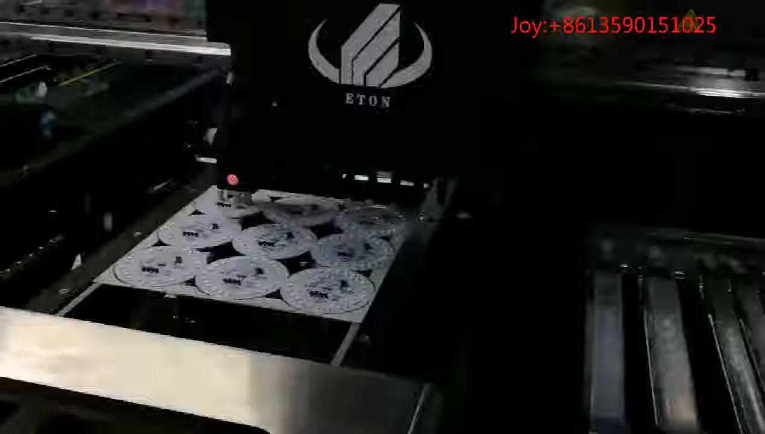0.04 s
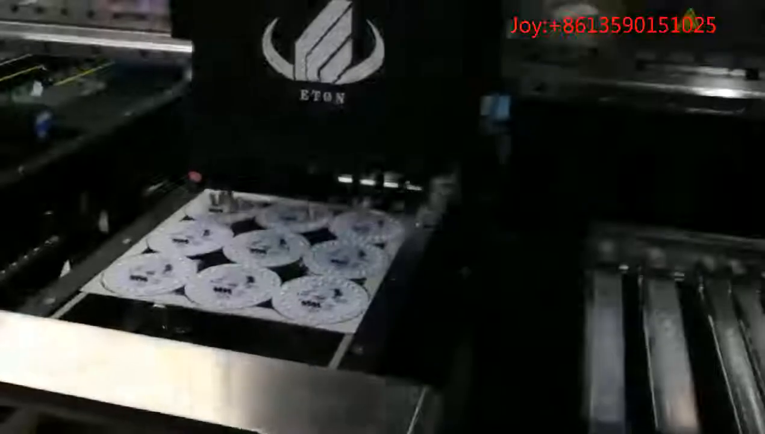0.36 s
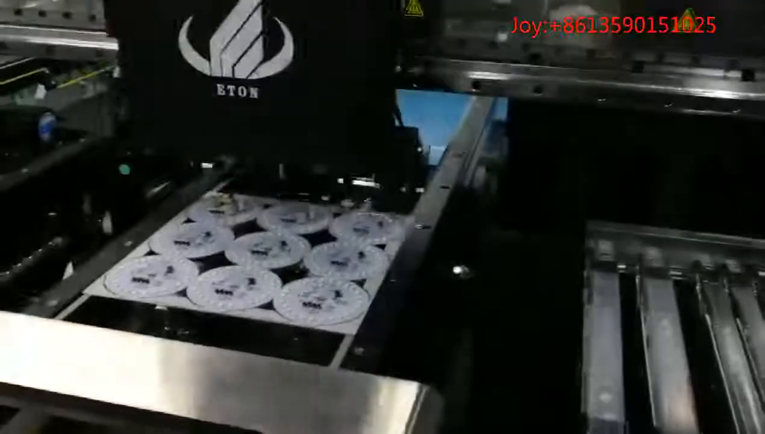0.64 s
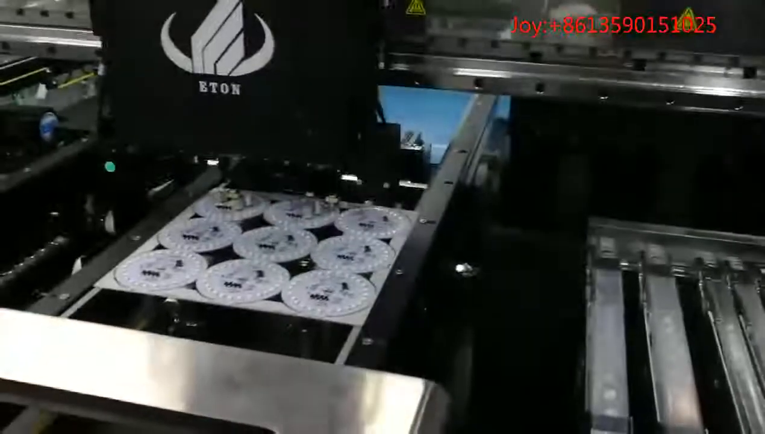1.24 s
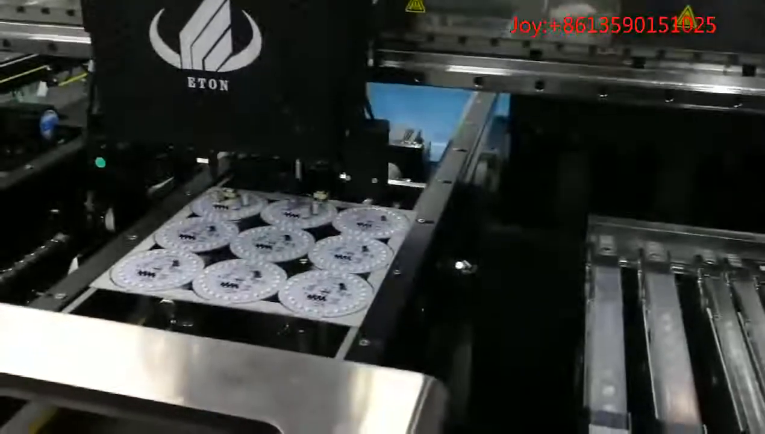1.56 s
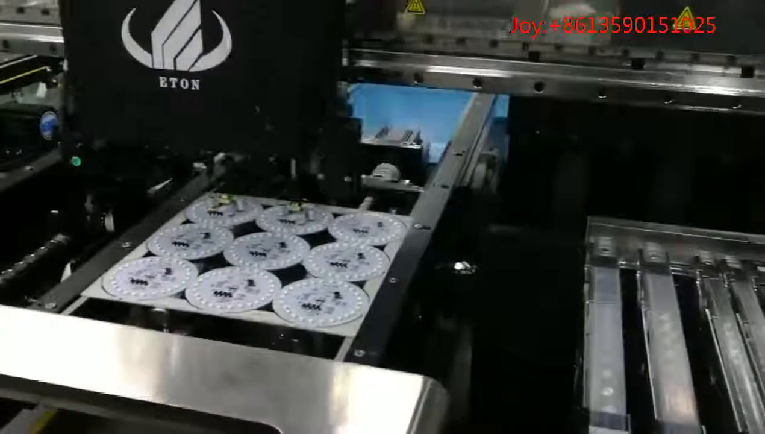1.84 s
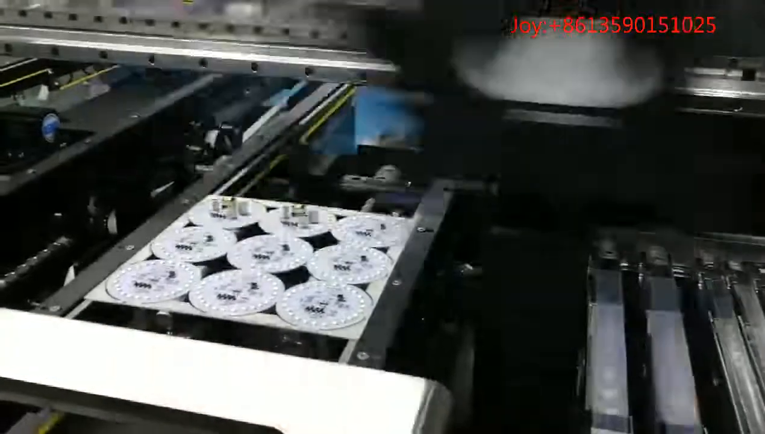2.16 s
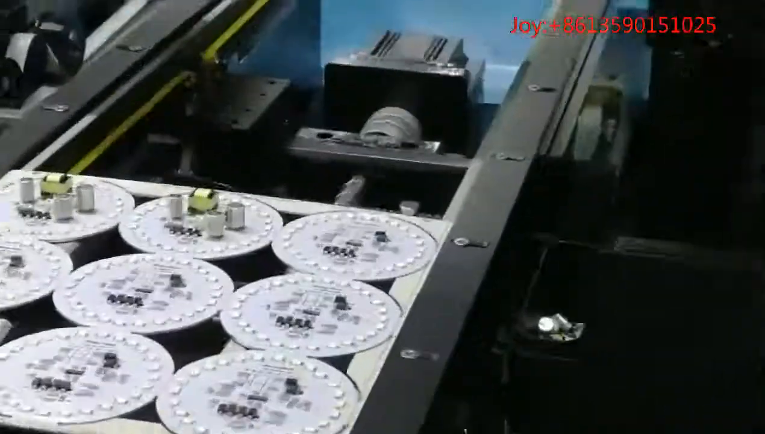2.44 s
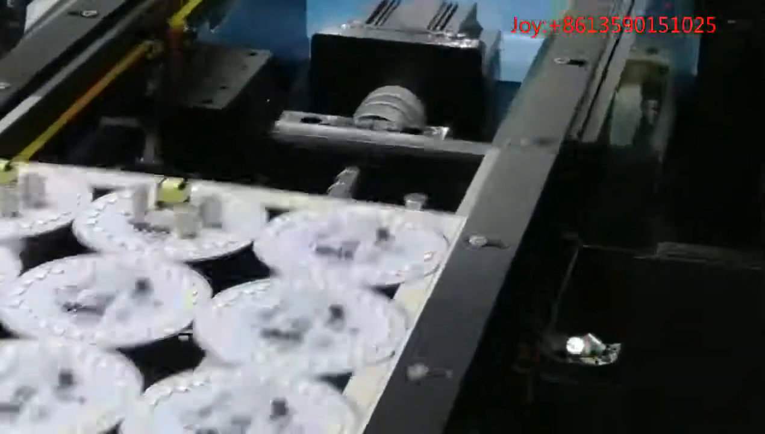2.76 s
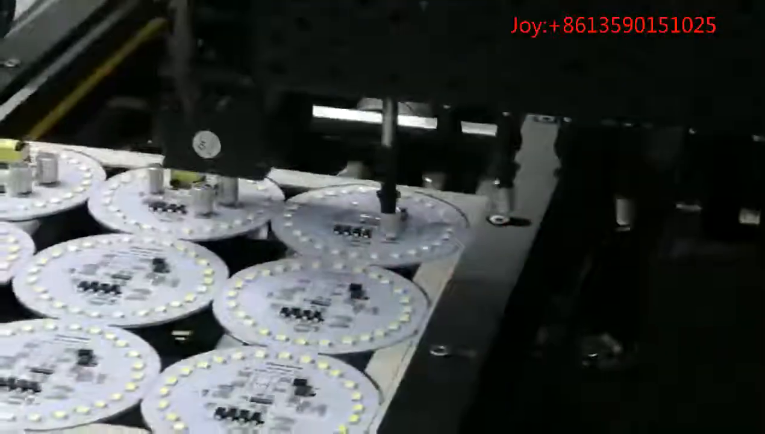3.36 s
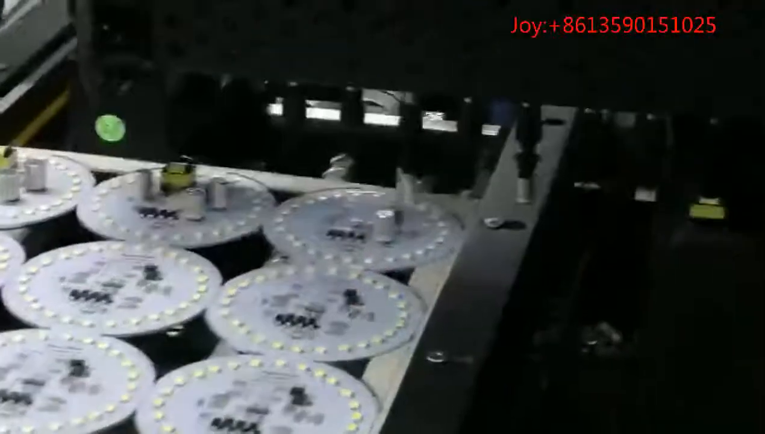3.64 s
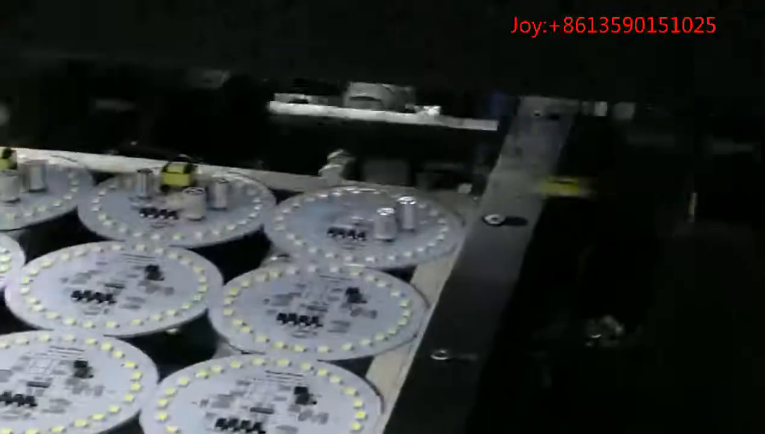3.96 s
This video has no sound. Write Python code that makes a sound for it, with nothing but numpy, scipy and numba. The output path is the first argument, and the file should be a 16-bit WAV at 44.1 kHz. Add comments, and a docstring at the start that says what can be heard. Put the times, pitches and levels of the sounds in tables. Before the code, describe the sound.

Close to an open circuit board assembly machine, fans and air lines run steadily while drives whirr. One brief, clack-like squeak rings in the steel cabinet, three loud bright hisses follow as the head travels, then another squeak.

```python
"""A pick-and-place machine, heard from just inside its open hood.
The sound cuts in at 0.2 s: fans, a vacuum pump and air lines run steadily while the drives whirr.
The head darts along its rails with a rush and a bright hiss. Near 0.7 s it sticks and slips, a sharp
squeak that rings briefly in the steel cabinet. The loudest moves come from 1.9 to 3 s, and a second
squeak at 3.3 s. An automatic volume control turns everything down briefly after loud sounds."""
import sys
import numpy as np
from scipy import signal
from scipy.fft import rfft, irfft
from scipy.io import wavfile
from scipy.ndimage import uniform_filter1d
from numba import njit

SR = 44100
rng = np.random.default_rng(int(sys.argv[2]) if len(sys.argv) > 2 else 0)


def inscribe(sig):
    """Save sig as 16-bit PCM at rate SR to the path in sys.argv[1].

    A 1-D sig is mono; a 2-D sig holds one channel per row.
    Samples are clipped to [-1, 1] before scaling.
    """
    pcm = np.round(np.clip(np.atleast_2d(sig).T, -1, 1) * 32767)
    wavfile.write(sys.argv[1], SR, pcm.astype(np.int16))


N = 176400
START_S = .2125  # silence until here
WAVER_DB = 2.5  # how much the hums and whirrs waver in level

# How alike left and right sound: f/Hz, likeness (0 is unrelated, 1 or more is the same)
LIKENESS = [(60, 5.6), (130, 1.36), (290, 0.69), (640, -0.35), (1400, 0.0646), (8000, -0.01)]


def undb(db):
    """Turn decibels into a gain to multiply by."""
    return 10 ** (np.asarray(db) / 20)


def unit(x):
    """Scale a signal to an average strength (rms) of 1."""
    return x / np.sqrt(np.mean(x ** 2))


def along(points, hz):
    """Read between (f/Hz, value) points, giving each octave equal room."""
    p = np.array(points, float)
    return np.interp(np.log(np.maximum(hz, 1)), np.log(p[:, 0]), p[:, 1])


def walk(rate):
    """A smooth random wobble of size 1 that changes about `rate` times a second."""
    k = max(int(SR / rate), 2)
    steps = np.repeat(rng.standard_normal(N // k + 2), k)
    return unit(uniform_filter1d(uniform_filter1d(steps, k), k)[:N])


def sides(db):
    """Left and right gains that make the left `db` louder."""
    return undb(np.array([[1], [-1]]) * db / 2)


def swell(t, start, end, rise, fall):
    """Rise smoothly from 0 towards 1, then fall back."""
    return np.sin(np.pi / 2 * np.clip(np.minimum((t - start) / rise, (end - t) / fall), 0, 1)) ** 2


def air(colour, rings=()):
    """Stereo noise shaped by `colour`, with optional peaks and dips; both sides share the bass."""
    hz = np.arange(N // 2 + 1) * SR / N
    mid, side = rfft(rng.standard_normal((2, N)))
    like = np.clip(along(LIKENESS, hz), -.999, .999)
    gain = undb(along(colour, hz))
    for centre, width, db in rings:
        gain = gain * undb(db / (1 + (2 * (hz - centre) / width) ** 2))
    stereo = mid * np.sqrt(1 + like) + np.array([[1], [-1]]) * side * np.sqrt(1 - like)
    return unit(irfft(gain * stereo, N))


def stereo_tone(phase, hz):
    """A tone whose two sides are in step if it is low, and out of step if it is higher."""
    apart = np.arccos(np.clip(along(LIKENESS, hz), -1, 1)) * np.array([[.5], [-.5]])
    return np.sqrt(2) * np.sin(phase + apart)


@njit
def follow(x, attack, release):
    """Track a level, rising quickly and falling slowly."""
    out, level = np.empty(len(x)), 0.
    for i in range(len(x)):
        level += (x[i] - level) * (attack if x[i] > level else release)
        out[i] = level
    return out


def fans():
    """Fans stir the air into a noise whose octaves swell together and flicker one by one."""
    # Tone colour of the moving air: f/Hz, relative level/dB
    colour = [(15, -36), (25, -9), (66, -11.5), (108, -7.5), (142, -7.5), (192, -8), (272, -4.5),
              (315, -9.5), (357, -8.5), (853, -10), (942, -8.5), (1270, -11), (1670, -11.5), (2090, -12.5),
              (2880, -12), (9500, -14), (12400, -39), (20900, -120)]
    # Pitches that the hood boosts or weakens: f/Hz, width/Hz, gain/dB
    hood = [(924, 71, 5), (1920, 130, 3.5), (2280, 1050, -4.5), (2880, 280, 3), (4360, 400, 0),
            (5330, 800, -2), (8780, 1030, 3)]
    # Which side is louder: f/Hz, left minus right/dB
    balance = [(200, 0), (380, -2.5), (700, 4), (1300, 0), (2400, 0), (4400, -4), (8100, -0.5),
               (15000, 14.5)]
    level_db, swell_db, flicker_db = -29, 1.1, 2.76
    hz = np.arange(N // 2 + 1) * SR / N
    spectrum = rfft(air(colour, hood)) * sides(along(balance, hz))
    octave = np.clip(np.log2(np.maximum(hz, 1) / 32), 0, 9)
    out, shared_db = 0, swell_db * walk(2.966)
    for k in range(10):
        band = irfft(spectrum * np.maximum(1 - abs(octave - k), 0), N)
        out = out + band * undb(shared_db + flicker_db * (1 - k / 10) * walk(22.86))
    return undb(level_db) * out


def motors():
    """The pump and fan motors hum, wavering in pitch and level."""
    # Tones of the hum: f/Hz, level/dB, pitch wander/Hz
    hums = [(23.5, -54, 0.94), (93.9, -51, 2.9), (117.8, -45.5, 2.45), (147, -51, 1.73), (219, -48, 2.08),
            (271.3, -45.5, 1.07), (457.2, -49, 4.13), (591, -50, 1.8), (638, -49.5, 2.3),
            (967, -44.5, 2.31), (1734, -51.5, 2.03), (1974, -59, 3.1), (5988, -78, 11.9), (7488, -59, 3)]
    out = 0
    for hz, db, wander in hums:
        phase = 2 * np.pi * np.cumsum(hz + wander * walk(14)) / SR
        out = out + undb(db) * unit(undb(WAVER_DB * walk(11))) * stereo_tone(phase, hz)
    return out


def servos(t):
    """The drive motors whirr roughly, their pitch gliding with their speed."""
    # Whirrs: start/s, end/s, first f/Hz, last f/Hz, width/Hz, level/dB
    whirrs = [(0.098, 0.713, 268, 266, 13.85, -41), (0.204, .46, 950, 398.6, 260, -36.5),
              (0.978, 1.323, 116, 116.7, 14, -39), (1.92, 2.169, 995, 1309, 243, -33.5),
              (2.281, 2.44, 1350, 796, 260, -38), (2.638, 3.193, 116, 115.3, 15, -38.5),
              (2.702, 2.949, 1800, 1200, 250, -39), (3.579, 3.753, 1200, 1146, 260, -43)]
    out = 0
    for start, end, first_hz, last_hz, width, db in whirrs:
        hz = np.interp(t, [start, end], [first_hz, last_hz]) + width / 2 * walk(2 * width)
        roughness = unit(undb(WAVER_DB * walk(2 * width)))
        level = undb(db) * swell(t, start, end, rise=.058, fall=.058) * roughness
        out = out + level * stereo_tone(2 * np.pi * np.cumsum(hz) / SR, first_hz)
    return out


def gantry(t):
    """The beam that carries the head travels slowly and makes the frame rumble."""
    # Trips of the beam: start/s, end/s, level/dB
    trips = [(.1, 0.683, -34), (0.968, 1.2, -37.5), (2.483, 2.66, -37.5), (2.657, 3.147, -40.5)]
    # Tone colour of the rumble: f/Hz, relative level/dB
    colour = [(40, -22), (90, 1), (150, -2.5), (250, 5), (400, -6), (800, -8), (1300, -23), (3000, -38)]
    level = sum(undb(db) * swell(t, start, end, rise=.021, fall=.021) for start, end, db in trips)
    return air(colour) * level


def compressed_air(t):
    """The air lines hiss thinly all the time; the valves add short, bright spits."""
    # Spits of the valves: start/s, length/s, level/dB
    spits = [(0.67, 0.025, -24), (1.037, 0.067, -32), (3.306, 0.029, -25)]
    # Tone colour of a spit: f/Hz, relative level/dB
    spit_colour = [(3000, -25), (6000, -4), (9000, 7), (11000, -3), (13000, -5), (15500, -7)]
    # Tone colour of the air lines: f/Hz, relative level/dB
    line_colour = [(3000, -18), (8500, 0.5), (10800, -3), (11600, 3.5), (12600, -0.5), (14000, -1),
                   (15800, -4.5)]
    line_db = -45
    bursts = sum(undb(db) * swell(t, at, at + length, length / 2, length / 2) for at, length, db in spits)
    return air(spit_colour) * bursts + air(line_colour) * undb(line_db) * sides(-1)


def head(t):
    """The head runs along its rails: a rush and a steely hiss swell and fade with its speed."""
    # Moves: start/s, end/s, rise/s, fall/s, hiss/dB, rush/dB, hiss left minus right/dB
    moves = [(.15, 0.295, .05, 0.05, -38.5, -41, -5), (.52, 0.69, 0.097, 0.029, -31, -34.5, -3),
             (0.93, 1.14, 0.083, 0.12, -29, -31, 3), (1.5, 1.798, 0.11, 0.1, -39, -45, 4),
             (1.911, 2.177, 0.17, 0.11, -13, -25.5, 1.5), (2.187, 2.213, .01, .02, -29, -38, 0),
             (2.312, 2.473, 0.093, 0.11, -17.5, -30, 1), (2.483, 2.64, .04, 0.034, -35.5, -39, 2),
             (2.597, 2.98, 0.23, 0.11, -22, -27.5, 1), (2.943, 3.216, .03, 0.26, -33, -25.5, 4),
             (3.557, 3.843, 0.075, 0.17, -30, -34.5, 4)]
    # Tone colour of the bright hiss: f/Hz, relative level/dB
    hiss_colour = [(1500, -18), (3000, -31.5), (4400, -11), (6200, -10.5), (7400, -2.5), (8400, 0),
                   (9300, -3.5), (10200, -13), (11500, -16.5), (15500, -19)]
    # Steel parts that ring in the hiss: f/Hz, width/Hz, boost/dB
    steel = [(7488, 25, 3), (8316, 25, 4), (8420, 25, 3), (8555, 25, 4), (9262, 45, 2)]
    # Tone colour of the duller rush: f/Hz, relative level/dB
    rush_colour = [(300, -10), (700, -2.5), (1200, 0), (1900, -1.5), (2400, -3), (3100, -1.5), (4400, 2),
                   (6200, 0.5), (9000, -22.5), (11000, -23), (15500, -38)]
    hiss, rush, flutter_db = 0, 0, .9
    for start, end, rise, fall, hiss_db, rush_db, pan_db in moves:
        speed = swell(t, start, end, rise, fall)
        hiss = hiss + speed * undb(hiss_db) * sides(pan_db)
        rush = rush + speed * undb(rush_db)
    noise = hiss * air(hiss_colour, steel) + rush * air(rush_colour) * sides(-1.3)
    return noise * undb(flutter_db * walk(120))


def echoes(t, sound):
    """The steel cabinet and the workshop throw a sound back as a short, fading tail."""
    response, delay_s = 0, .002
    for fade_s, db in ((.095, -5.5), (.35, -17)):  # cabinet, workshop; fade_s is the time to drop 60 dB
        tail = rng.standard_normal((2, N)) * np.exp(-np.log(1000) * t / fade_s) * (t > delay_s)
        response = response + undb(db) * unit(tail) / np.sqrt(N)
    return signal.fftconvolve(sound[None], response, axes=1)[:, :N]


def squeaks(t):
    """The head sticks and slips; each slip is a gliding tone, the octave above it and some scrape."""
    # Slips: start/s, length/s, first f/Hz, last f/Hz, tone/dB, octave/dB
    slips = [(.652, .0096, 8700, 7600, -9.5, -42), (.6608, .0066, 6950, 5700, -4, -31),
             (.6668, .0056, 5150, 4300, -10, 2.5), (.673, .0024, 4650, 4450, -14, 0),
             (.738, .016, 4850, 4750, -31, -55), (3.2875, .0075, 5950, 6300, -15, -38),
             (3.3092, .0038, 4750, 4450, -14, -7)]
    # Tone colour of the scrape: f/Hz, relative level/dB
    scrape_colour = [(3000, -38), (4400, -3), (6000, 7), (7500, -6), (9200, -14), (11000, -11),
                     (15500, -22)]
    edge_s, scrape_db, right_db = .0012, -13.5, -10
    jitter = 1 + .026 * walk(1200)
    scrape = undb(scrape_db) * air(scrape_colour)[0]
    direct = 0
    for start, length, first_hz, last_hz, tone_db, octave_db in slips:
        hz = np.interp(t, [start, start + length], [first_hz, last_hz]) * jitter
        phase = 2 * np.pi * np.cumsum(hz) / SR
        squeal = undb(tone_db) * (np.sin(phase) + scrape) + undb(octave_db) * np.sin(2 * phase)
        direct = direct + swell(t, start, start + length, edge_s, edge_s) * squeal
    return np.array([direct, undb(right_db) * direct]) + echoes(t, direct)


def scene():
    """All the parts of the running machine, added together."""
    t = np.arange(N) / SR
    machine = fans() + motors() + servos(t) + gantry(t) + head(t) + compressed_air(t) + squeaks(t)
    return machine * (t > START_S)


def record(dry):
    """Two automatic volume controls turn loud moments down, then the highest treble is cut."""
    # Each control: acts above level/dB, squeeze ratio, reaction time/s, recovery time/s
    quick, slow = (-21.5, 1.404, .00099, .027), (-26, 1.187, .0033, .17)
    top_hz = 15950
    for db, ratio, attack, release in (quick, slow):
        loudness = follow(np.sqrt(np.mean(dry ** 2, axis=0)), 1 / (attack * SR), 1 / (release * SR))
        dry = dry * np.maximum(loudness / undb(db), 1) ** (1 / ratio - 1)
    return signal.sosfilt(signal.ellip(10, .2, 80, top_hz, fs=SR, output="sos"), dry)


dry = scene()
out = record(dry)
inscribe(out)
```